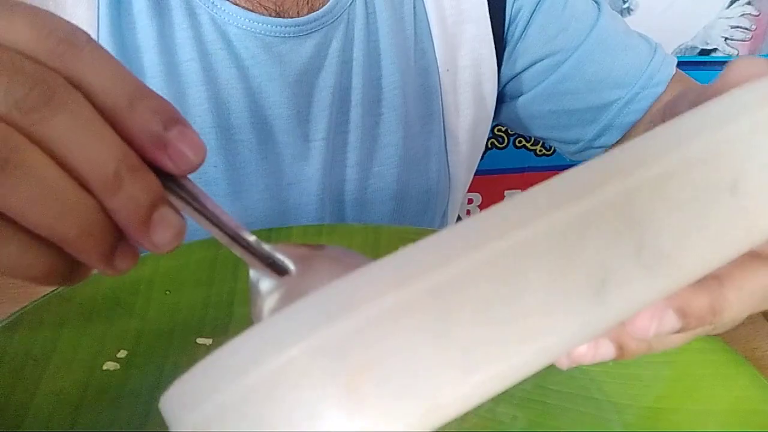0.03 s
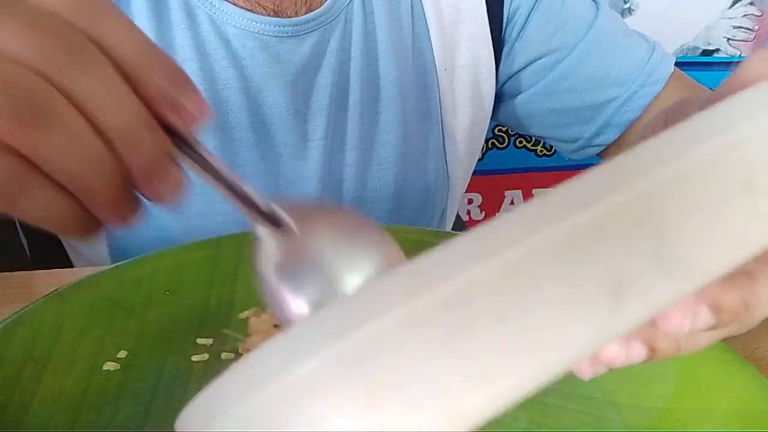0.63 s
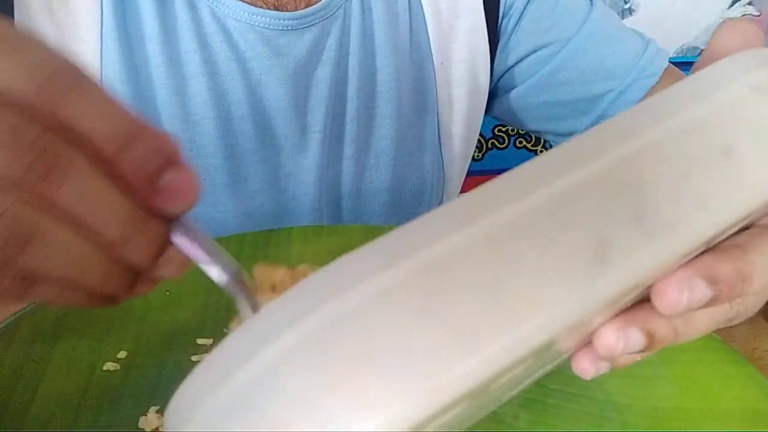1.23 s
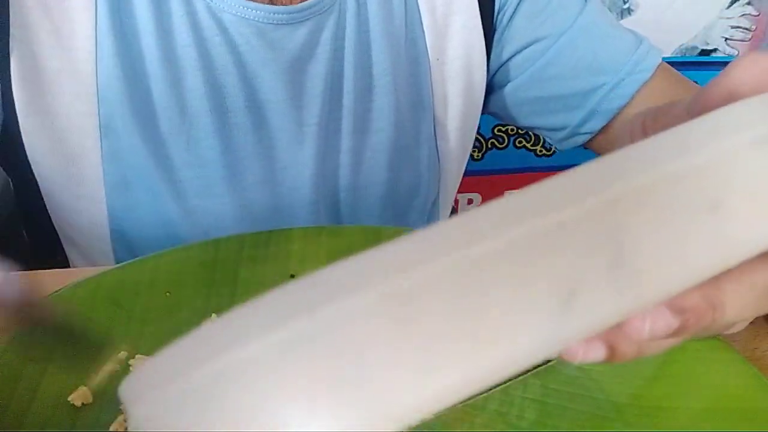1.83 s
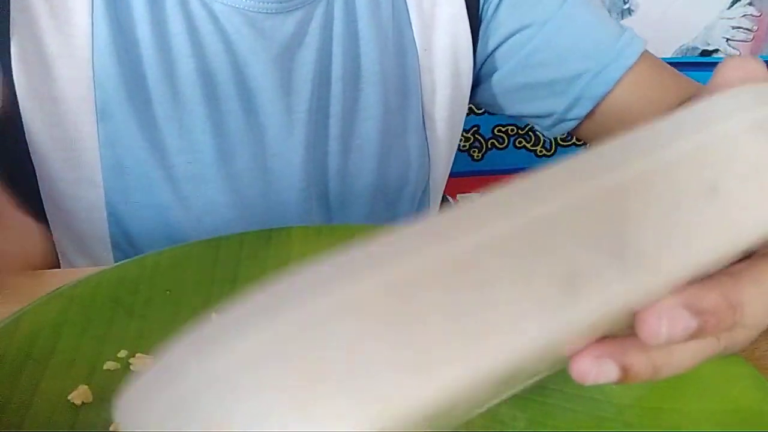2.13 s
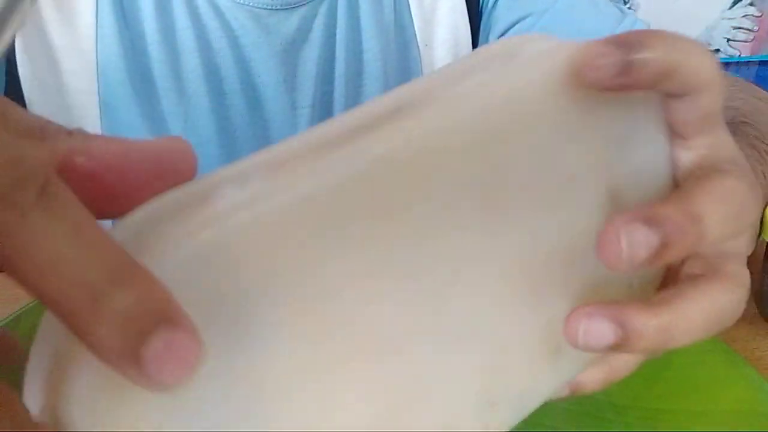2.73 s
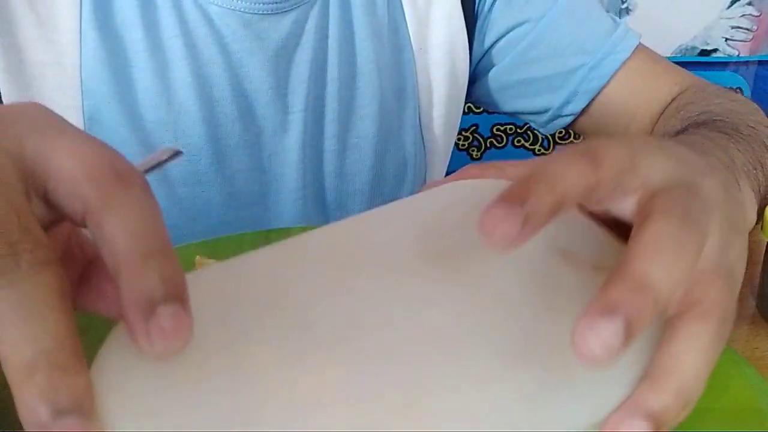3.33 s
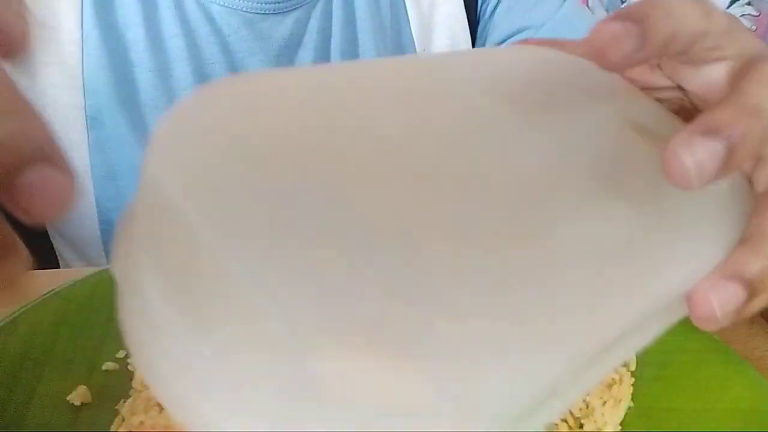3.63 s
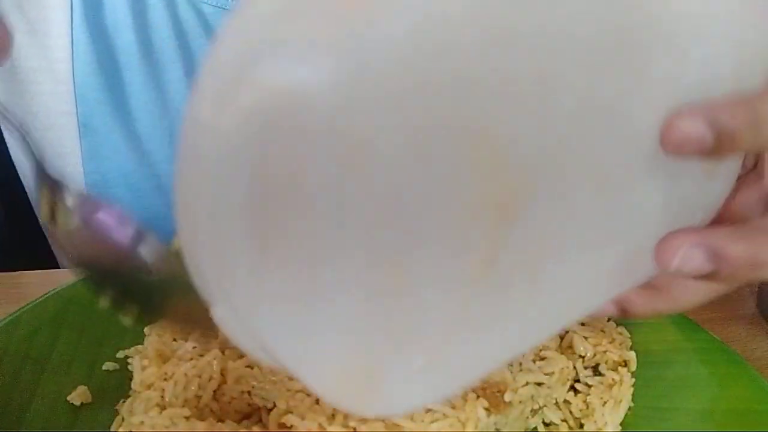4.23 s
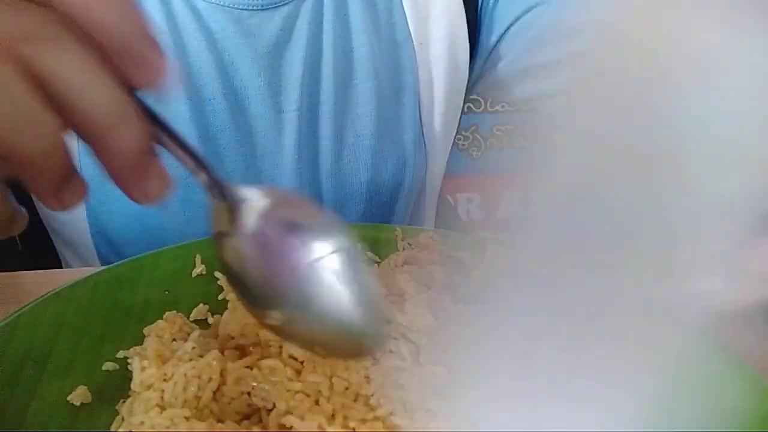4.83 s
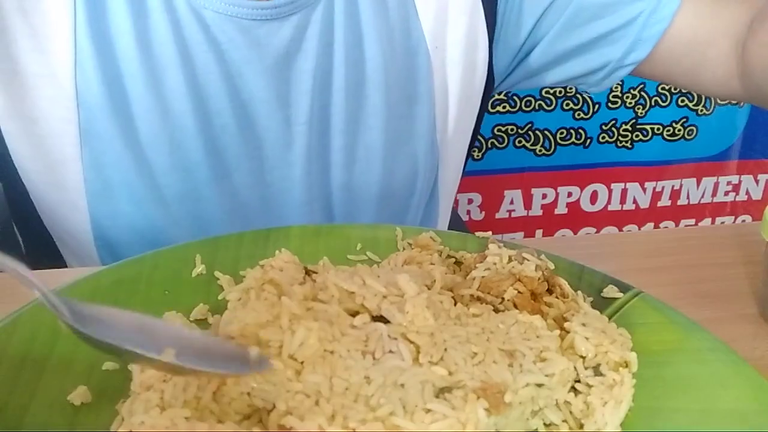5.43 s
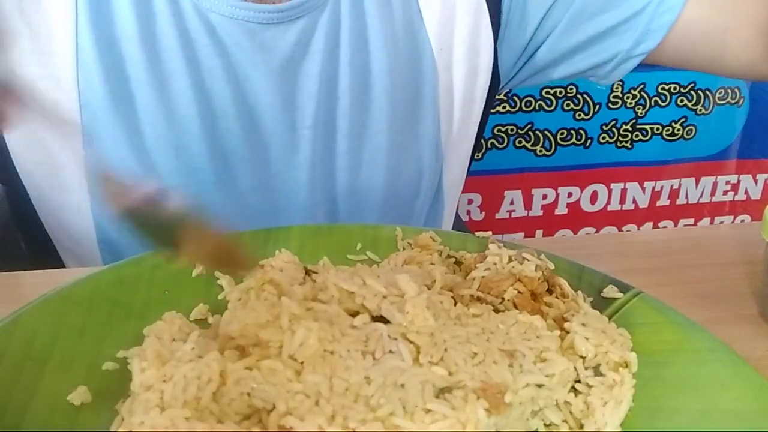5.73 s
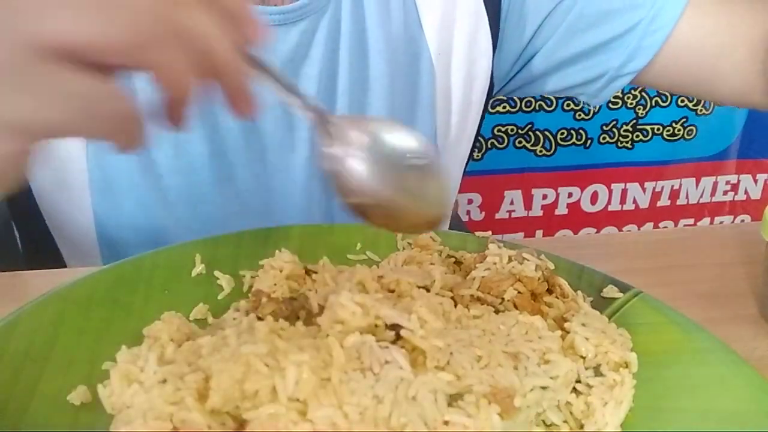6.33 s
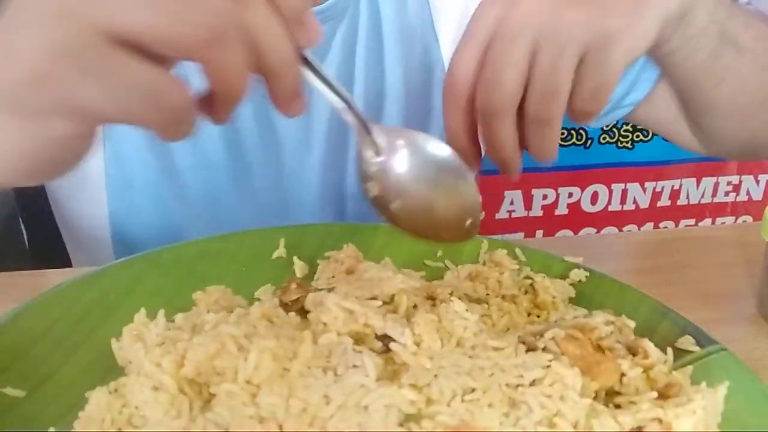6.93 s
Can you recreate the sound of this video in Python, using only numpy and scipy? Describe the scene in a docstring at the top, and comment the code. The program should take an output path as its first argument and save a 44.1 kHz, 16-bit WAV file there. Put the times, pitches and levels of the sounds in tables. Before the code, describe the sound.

A steel spoon clicks lightly and scrapes through moist rice in a plastic tub. It knocks on the tub twice, each time with a short rattle and ring, the second knock harder. The tub is set on the table with a thud, then the spoon clatters briefly and digs softly into rice on a plate. A fan hums throughout in the small, echoing room, heard from close by.

```python
"""A fan hums in a small, echoing room while a steel spoon clicks and scrapes through rice in a plastic tub.
The spoon knocks on the tub twice, hard and with a short rattle, and the rice flops onto a plate.
The tub is put down on the table with a thud; the spoon clatters briefly and digs in again.
The knocks make plastic and steel ring, and the room answers. A limiter squashes the two
hard knocks, so their echo swells up behind them."""
import sys
import numpy as np
from scipy import signal
from scipy.fft import rfft, irfft
from scipy.io import wavfile
from scipy.ndimage import uniform_filter1d

SR = 44100
rng = np.random.default_rng(int(sys.argv[2]) if len(sys.argv) > 2 else 0)


def transcribe(u):
    """Save the signal u as a 16-bit wav file named by the first command-line argument.

    u: samples, shape (n,) or (channels, n), limited to [-1, 1]; the rate is SR.
    q: integer samples, one column per channel.
    """
    v = np.clip(np.atleast_2d(u).T, -1, 1)
    q = np.round(v * 32767).astype(np.int16)
    wavfile.write(sys.argv[1], SR, q)


N = 313110
HIT = 24576  # samples in one hit with its echo
TIME, FREQS = np.arange(N) / SR, np.fft.rfftfreq(N, 1 / SR)
HIT_TIME, HIT_FREQS = np.arange(HIT) / SR, np.fft.rfftfreq(HIT, 1 / SR)


def amp(db):
    """Turns decibels into a number to multiply by."""
    return 10 ** (np.asarray(db) / 20)

def curve(points, hz):
    """Joins (frequency, value) points into a line and reads it at hz."""
    f, value = np.transpose(points)
    return np.interp(np.log(hz + 1), np.log(f + 1), value)

def add(mix, s, sound):
    """Mixes a stereo sound in at s seconds."""
    part = mix[:, max(round(s * SR), 0):][:, :sound.shape[1]]
    part += sound[:, :part.shape[1]]

def sides(db):
    """Left and right gains that make the left louder by db, with the same total power."""
    pair = amp(np.array([[.5], [-.5]]) * db)
    return pair / np.sqrt(np.mean(pair ** 2, 0))

def unit(sound):
    """Scales a stereo sound to an average energy of 1 per side."""
    return sound / np.sqrt(np.sum(sound ** 2) / 2)

def drift(rate_hz):
    """A slow random wobble, about 1 in size."""
    slow = irfft(rfft(rng.standard_normal(N)) / (1 + (FREQS / rate_hz) ** 4), N)
    return slow / slow.std()

def bump(hz, centre, width, height):
    """A resonance: a peak around a pitch at which a thing likes to ring."""
    return height / (1 + (2 * (hz - centre) / width) ** 2)

# How alike left and right are: (frequency [Hz], likeness [1 = same, -1 or less = opposite])
LIKENESS = [(40, 0.98), (170, 0.81), (450, 0.74), (1200, 0.79), (1900, 0.28), (2800, -0.26), (3080, -0.7),
            (3280, -1.91), (3500, -0.56), (3800, -1.29), (4100, -0.016), (15000, 0.1)]
def diffuse(size):
    """Hiss that reaches two microphones from all around."""
    alike = np.clip(curve(LIKENESS, np.fft.rfftfreq(size, 1 / SR)), -.99, .99)
    mid, side = rfft(rng.standard_normal((2, size))) * np.sqrt([(1 + alike) / 2, (1 - alike) / 2])
    return irfft(np.array([mid + side, mid - side]), size)

# How long the room echoes; a fade time (t60) is a drop of 60 dB: (frequency [Hz], fade time [s])
ROOM_FADE = [(100, 0.1), (300, 0.68), (1000, 0.43), (2500, 0.35), (6000, 0.37), (10000, 0.24), (15000, 0.2)]
def room(early_boost=0.27, early_s=0.0091):
    """The echo: each pitch fades at its own speed, and near walls answer first and loudest."""
    hz, t, bands = signal.stft(diffuse(HIT), SR, nperseg=256)
    fade = amp(-60 * t / curve(ROOM_FADE, hz)[:, None])
    tail = signal.istft(bands * fade, SR)[1][:, :HIT]
    onset = 1 - np.exp(-HIT_TIME / 0.002)
    return unit(tail * onset * (1 + early_boost * np.exp(-HIT_TIME / early_s)))

def through_body(drive, tone_db, balance_db):
    """Gives a sound the tone of an object that rings only after it is hit (a minimum-phase filter)."""
    log_gain = np.log(amp(np.maximum(tone_db - tone_db.max(), -90)) * sides(balance_db))
    mirrored = np.c_[log_gain, log_gain[:, -2:0:-1]]
    body = np.exp(np.conj(signal.hilbert(mirrored)))[:, :len(tone_db)]
    return irfft(rfft(drive) * body)

def blow(tone_db, balance_db, contact, echo_db, shade_db=0):
    """A touch shakes an object: we hear it directly, then from the room."""
    direct = through_body(contact, tone_db + shade_db, balance_db)
    echo = through_body(room(), tone_db, balance_db)
    fade_out = np.minimum(np.linspace(8, 0, HIT), 1)
    return (unit(direct) + amp(echo_db) * unit(echo)) * fade_out

def buzz(decay_s):
    """Hard surfaces buzz against each other for a moment as they meet."""
    return diffuse(HIT) * np.exp(-HIT_TIME / decay_s)

# The fan's rushing air: (frequency [Hz], relative level [dB])
AIR_TONE = [(25, -104), (55, -107), (95, -92), (200, -75.5), (400, -69), (720, -79.5), (900, -76.5),
            (1300, -77.5), (2000, -83.5), (3500, -84.5), (4900, -82.5), (7700, -94.5), (8400, -108),
            (13500, -119), (15500, -132)]
# Which side the air is louder on: (frequency [Hz], left minus right [dB])
AIR_SIDES = [(60, -3), (300, -0.5), (1200, 1), (1800, -2.5), (3400, -1), (4400, -6), (5600, -7.5),
             (7500, -0.5), (10000, 0.5)]
def fan(direct_share=0.23, left_lead_s=0.00019, flutter_db=0.8):
    """A fan on the left rushes and hums, steady at first, then slowly louder."""
    rise_from_s, air_db_per_s, hum_db_per_s = 3.88, 0.5, 2
    rising_s = np.maximum(TIME - rise_from_s, 0)
    delay = np.exp(-2j * np.pi * FREQS * np.array([[0], [left_lead_s]]))
    direct = rfft(rng.standard_normal(N)) * delay
    rush = np.sqrt(direct_share) * direct + np.sqrt(1 - direct_share) * rfft(diffuse(N))
    air = irfft(rush * amp(curve(AIR_TONE, FREQS)) * sides(curve(AIR_SIDES, FREQS)), N) * np.sqrt(SR / 2)
    notes = hum() * amp(-1 + hum_db_per_s * rising_s)
    return notes + air * amp(-1.89 + air_db_per_s * rising_s + flutter_db * drift(36.0))

# The fan's notes: (pitch [Hz], relative level [dB], pitch wobble [Hz])
HUM_NOTES = [(121.5, -62, 1.37), (177.3, -55.5, 1.77), (413, -59.5, 5.02), (583, -82, 4),
             (885, -61.5, 11.04)]
def hum(scatter=0.92):
    """Each wavering fan note has a steady part and a part that the moving air scatters."""
    out = np.zeros(N)
    for hz, db, wobble_hz in HUM_NOTES:
        swirl = (drift(11.4) + 1j * drift(7.2)) / np.sqrt(2)
        note = np.exp(2j * np.pi * np.cumsum(hz + wobble_hz * drift(2.883)) / SR)
        out += amp(db) * np.sqrt(2) * ((1 + scatter * swirl) * note).real / np.hypot(1, scatter)
    return out

def breeze(db=-74, centre_hz=92, width_hz=26, gust_db=4, balance_db=-9):
    """The fan's breeze rumbles in little gusts, mostly on the right microphone."""
    rumble = irfft(rfft(diffuse(N)) / (1 + (2 * (FREQS - centre_hz) / width_hz) ** 4), N)
    return rumble / rumble.std() * sides(balance_db) * amp(db + gust_db * drift(5.9))

# The basic tone of a click: (frequency [Hz], relative level [dB])
CLICK_TONE = [(35, -49), (100, -28), (700, -8), (1400, -3), (1950, 3), (2900, -3), (3800, 0), (4400, 3),
              (5600, 1), (6500, 1), (7500, -0.5), (8600, -8.5), (12000, -20.5), (16000, -31)]
# Light touches: (time [s], level [dB], brightness [dB per octave], left minus right [dB],
# buzz time [s], pitch of the touched spot [Hz], boost at that pitch [dB], echo [dB])
TOUCHES = [(0.0304, -17.5, -8.5, -5, 0.0023, 1910, -2, -9), (0.5759, -16, -9, -2, 0.0012, 1790, 7, -9),
           (1.07, -10.5, -4.5, -4, 0.0016, 5130, 10, -2.5), (1.397, -11, -6, -5, 0.0036, 4800, 9.5, -8.5),
           (3.1727, -14.5, -9.5, -12, 0.0038, 4200, 8, 0), (5.444, -4.5, -4, -6, 0.0022, 7050, 5.5, -1),
           (6.3074, -6.5, -5, -13, 0.0028, 5760, 9, -3), (6.3199, 4.5, 2, -11, 0.0018, 5370, 13.5, -9),
           (6.3205, -0.5, -6, -13, 0.002, 2050, 14, -7), (6.3239, -3, 3, -7, 0.0014, 5550, 6, -7),
           (6.3393, -7, -9, -6, 0.0023, 2100, 2, -5), (6.346, -2, -4, -5, 0.0031, 5560, 13, -14)]
def clicks(ping_hz=5430, ping_db=-38, ping_fade_s=.08, ping_width_hz=800):
    """Spoon and plastic touch; the spoon's bowl pings more when the spot is close to its own pitch."""
    out = np.zeros((2, N))
    ping = amp(ping_db - 60 * HIT_TIME / ping_fade_s) * np.sin(2 * np.pi * ping_hz * HIT_TIME)
    for s, db, brightness, balance_db, buzz_s, spot_hz, spot_db, echo_db in TOUCHES:
        tone = curve(CLICK_TONE, HIT_FREQS) + brightness * np.log2(1 + HIT_FREQS / 500)
        tone += bump(HIT_FREQS, spot_hz, .24 * spot_hz, spot_db)
        click = blow(tone, balance_db, buzz(buzz_s), echo_db)
        closeness = bump(spot_hz, ping_hz, ping_width_hz, 1)
        add(out, s, amp(db) * (click + sides(balance_db) * closeness * ping))
    return out

# The tone of moist rice: (frequency [Hz], relative level [dB])
RICE_TONE = [(100, 0), (400, 3), (1400, 8), (2300, 3), (3300, -3), (5000, 4), (7500, -10), (9000, -16),
             (15000, -46)]
# Spoon strokes through the rice: (time of the firmest press [s], length [s], level [dB])
RICE_STROKES = [(0.713, 0.97, -55.5), (5.647, 0.56, -58), (6.797, 0.37, -49)]
def rice(grains_per_s=500, spread_db=4, tick_s=0.0011, stroke_ends_db=-28, echo_db=-3):
    """Moist grains stick and let go in tiny ticks as each stroke presses and eases."""
    pressure = sum(amp(db + stroke_ends_db * (2 * (TIME - s) / length) ** 2)
                   for s, length, db in RICE_STROKES)
    lets_go = rng.random(N) < grains_per_s / SR
    ticks = lets_go * amp(spread_db * np.minimum(rng.exponential(1, N), 4))
    grains = diffuse(N) * signal.lfilter([1], [1, -np.exp(-1 / (SR * tick_s))], ticks)
    grains = irfft(rfft(grains) * amp(curve(RICE_TONE, FREQS)), N)
    direct = grains / grains.std() * pressure
    return direct + amp(echo_db) * signal.oaconvolve(direct, room(), axes=1)[:, :N]

# The tone of a scrape: (frequency [Hz], relative level [dB])
SCRAPE_TONE = [(35, -50), (100, -22), (800, -16), (1300, -2), (2150, -4), (2800, -10), (5000, -9),
               (8000, -29), (15000, -50)]
# Short swelling scrapes; two are tiny swells leading into the hard knocks:
# (time of the peak [s], swell time [s], level [dB])
SWELLS = [(2.067, .0013, -6), (3.138, 0.027, -12), (3.178, .014, -12.5), (3.8494, .003, 2),
          (3.874, 0.0032, 8), (3.937, .004, 6), (3.963, .003, 1.5), (4.013, 0.0052, -4)]
def scrapes(ticks_per_s=900, smooth_hiss=0.42, echo_db=-9):
    """A hiss roughened by quick ticks swells to a peak and stops short."""
    out = np.zeros((2, N))
    for s, swell_s, db in SWELLS:
        length_s = 4 * swell_s
        to_go_s = length_s - HIT_TIME
        swell = (to_go_s > 0) * np.exp(-abs(to_go_s) / swell_s)
        roughness = (rng.random(HIT) < ticks_per_s / SR) + smooth_hiss
        rasp = diffuse(HIT) * roughness * swell
        add(out, s - length_s, amp(db) * blow(curve(SCRAPE_TONE, HIT_FREQS), 0, rasp, echo_db))
    return out

# The overall tone of the tub: (frequency [Hz], relative level [dB])
TUB_TONE = [(30, -38), (150, -0.5), (400, 3), (800, -5.5), (1300, 3), (2800, 1.5), (3800, -0.5), (5000, 6),
            (7300, 1.5), (8400, 1.5), (11000, -1), (14500, -7), (16000, -54)]
# The tub's resonances: (pitch [Hz], width [Hz], boost if hit on the end [dB], if hit on the wall [dB])
TUB_PEAKS = [(263, 47, 13, 3.5), (1120, 49, -2, 7.5), (1325, 100, 5, 9), (1580, 160, 2, 5),
             (1934, 190, -2, 7.5), (2200, 200, 10.5, 11), (2540, 120, -4, 15), (3330, 390, 12, 13.5),
             (4380, 890, 13.5, -1), (4850, 620, -9, 5.5), (5460, 730, -11, 2), (5870, 500, 14.5, -3),
             (6650, 540, -6, 7), (7380, 440, 11, 5), (14100, 400, 8, 5)]
# The tub aims its highest treble away, so it is duller than its echo: (frequency [Hz], change [dB])
TUB_SHADE = [(100, -0.5), (700, -6), (1500, -4), (2200, 0), (3400, -6), (4500, -2), (5800, 2), (7300, -1),
             (8800, -22), (15000, -24)]
# Which side a knock is louder on: (frequency [Hz], left minus right [dB])
KNOCK_SIDES = [(300, -0.5), (1000, 0), (2600, -3.5), (3800, 4), (4800, -4.5), (5600, -6), (7000, 0),
               (9000, 4.5), (14000, 9.5)]
# Knocks: (time [s], level [dB], place [0 = end, 1 = wall], echo [dB], buzz time [s], rattle length [s])
HARD_KNOCKS = [(2.069, 19.8, 0.3, -4.5, 0.00098, .038), (3.8488, 28.4, 0.96, -5, 0.0014, .085)]
def knocks(clink_hz=2160, clink_db=-11, clink_fade_s=0.017, shove_db=-40):
    """The spoon hits the tub: the stiff end clinks, while a hit on the soft wall shoves the whole tub."""
    out = np.zeros((2, N))
    balance, shade = curve(KNOCK_SIDES, HIT_FREQS), curve(TUB_SHADE, HIT_FREQS)
    clink = amp(clink_db - 60 * HIT_TIME / clink_fade_s) * np.cos(2 * np.pi * clink_hz * HIT_TIME)
    for s, db, place, echo_db, buzz_s, rattle_s in HARD_KNOCKS:
        tone = curve(TUB_TONE, HIT_FREQS)
        for hz, width, end_db, wall_db in TUB_PEAKS:
            tone += bump(HIT_FREQS, hz, width, end_db + place * (wall_db - end_db))
        strike = blow(tone, balance, buzz(buzz_s), echo_db, shade) + (1 - place) ** 2 * clink
        rattled = signal.fftconvolve(strike, rattle(rattle_s), axes=1)[:, :HIT]
        add(out, s, amp(db) * (rattled + ring(place) + (1 - place) * hollow()))
        add(out, s, place * thud(db + shove_db, centre_hz=80, octaves=0.8, echo_db=4))
    return out

def rattle(length_s, count=24, gap_s=.0065, bounce_db=-11.5, fade_db_per_s=165):
    """One full hit, then the spoon bounces on the plastic, unevenly and ever more weakly."""
    gap_jitter, strength_jitter = 1 + .5 * rng.uniform(-1, 1, (2, count))
    after_s = np.cumsum(gap_s * gap_jitter)
    strength = strength_jitter * amp(bounce_db - fade_db_per_s * after_s)
    hits = signal.unit_impulse(HIT)
    hits[(after_s * SR).astype(int)] = (after_s < length_s) * strength
    return hits[None]

# Notes of rim and spoon: (pitch [Hz], level against an end knock [dB], a wall knock [dB], fade time [s])
RING_NOTES = [(1107, -60, -49, .35), (1296, -51, -49, .33), (1573, -54, -46, .33), (1852, -49, -54, .28),
              (1966, -56, -47, .3), (2110, -36, -50, .16), (2231, -31, -44, .22), (2541, -54, -50, .28),
              (4380, -39, -55, .08), (5980, -32, -58, .08), (13770, -58, -52, .22)]
def ring(place):
    """The tub's rim and the steel spoon ring on, reaching the two microphones out of step."""
    out = np.zeros((2, HIT))
    for hz, end_db, wall_db, fade_s in RING_NOTES:
        level = amp(end_db + place * (wall_db - end_db) - 60 * HIT_TIME / fade_s)
        note = np.sin(2 * np.pi * (hz * HIT_TIME + rng.random((2, 1))))
        out += sides(curve(KNOCK_SIDES, hz)) * level * note
    return out

def hollow(hz=262, db=-43, fade_s=0.83, grip_at_s=0.11, grip_fade_s=.09):
    """A knock on the end sets the hollow tub humming until the hand's grip cuts it short."""
    grip_db = 60 * np.maximum(HIT_TIME - grip_at_s, 0) / grip_fade_s
    return amp(db - 60 * HIT_TIME / fade_s - grip_db) * np.sin(2 * np.pi * hz * HIT_TIME)

# Low notes of the room that ring after each thud: (pitch [Hz], relative level [dB], fade time [s])
ROOM_NOTES = [(170.7, -26, 0.86), (214, -35, 0.51), (260, -28, 0.26), (325.7, -24.5, 0.29),
              (406, -22, 0.29), (476, -26.5, 0.26), (537, -33.5, 0.48), (620, -26, 0.26), (773, -27, 0.3),
              (885, -29, 0.3)]
def thud(db, centre_hz, octaves, echo_db, notes_db=-3, steepness_db=14, right_lag_s=0.00028):
    """One dull bump around centre_hz sets the room's nearby low notes ringing."""
    push = np.tile(signal.unit_impulse(HIT), (2, 1))
    band = -steepness_db * np.log10(1 + (np.log2((HIT_FREQS + 1) / centre_hz) / octaves) ** 4)
    band -= 10 * np.log10(1 + (HIT_FREQS / 2500) ** 4)  # dulls the treble
    heard_s = np.maximum(HIT_TIME - np.array([[0], [right_lag_s]]), 0)
    notes = np.zeros((2, HIT))
    for hz, note_db, fade_s in ROOM_NOTES:
        level = amp(note_db + np.interp(hz, HIT_FREQS, band) - 60 * HIT_TIME / fade_s)
        notes += level * np.sin(2 * np.pi * hz * heard_s)
    bass_cut = signal.butter(3, 150, "high", fs=SR, output="sos")
    return amp(db) * (blow(band, 0, push, echo_db) + amp(notes_db) * signal.sosfilt(bass_cut, notes))

# Dull bumps: (time [s], level [dB], centre pitch [Hz], spread [octaves], echo [dB], room notes [dB])
DULL_BUMPS = [(2.084, -11, 140, 0.36, 1, 2), (2.14, -12.5, 453, 1.1, 7, -3.5),
              (2.754, -24, 89, 0.39, 2, -4), (3.130, -19, 307, 0.92, 9, 2.5),
              (3.16, -9, 313, 0.67, -20, -17), (3.167, -3, 267, 0.34, -9, -10.5),
              (3.848, 0, 450, 0.8, -20, -25), (5.4425, 2.5, 1184, 0.3, -3, -10),
              (5.4453, -1, 575, 0.83, 2.5, 1.5), (5.4995, -14, 1200, 0.27, -15, -12),
              (6.086, -16.5, 268, 0.46, -3, -11), (6.309, -18, 302, 0.25, -6, 8),
              (6.3237, -6, 295, 0.23, 0, 6), (6.335, -7.5, 340, 0.65, -2, -6.5),
              (6.3539, -5.5, 313, 0.61, -5, -4.5)]
def thuds():
    """Dull low bumps, including a low swell behind the first knock."""
    out = np.zeros((2, N))
    for s, *settings in DULL_BUMPS:
        add(out, s, thud(*settings))
    return out

def scene():
    """Everything at the table, with the fan behind it."""
    return fan() + breeze() + clicks() + rice() + scrapes() + knocks() + thuds()

def record(dry, limit_db=-8, recover_db_per_s=135, ceiling=.75, top_hz=15800):
    """A limiter turns loud moments down at once and recovers steadily; the highest treble is cut."""
    power_db = 10 * np.log10(abs(uniform_filter1d((dry ** 2).mean(0), size=36)) + 1e-12)
    recovery_db = TIME * recover_db_per_s
    cut_db = np.maximum.accumulate(np.maximum(power_db - limit_db, 0) + recovery_db) - recovery_db
    limited = dry / amp(uniform_filter1d(np.roll(cut_db, -45), size=80))  # acts 1 ms ahead
    rounded = limited / (1 + (limited / ceiling) ** 6) ** (1 / 6)  # rounds off the tallest peaks
    treble_cut = signal.firwin(255, top_hz, window=("kaiser", 9), fs=SR)
    return signal.oaconvolve(rounded, treble_cut[None], "same")


dry = scene()
out = record(dry)
transcribe(out)
```